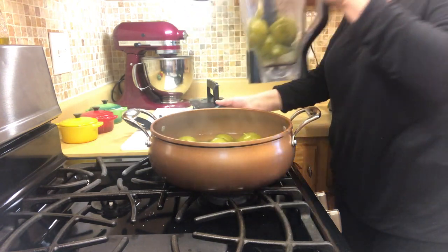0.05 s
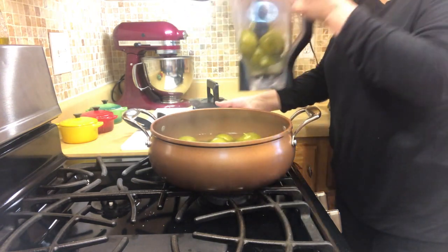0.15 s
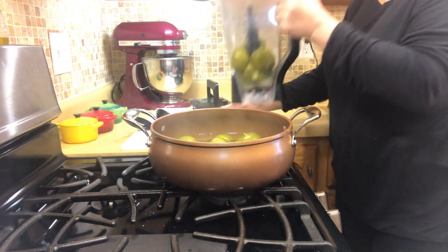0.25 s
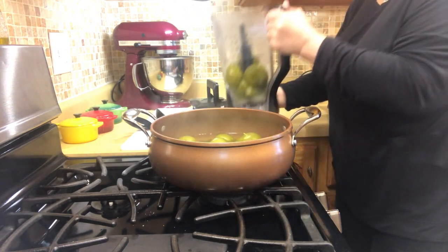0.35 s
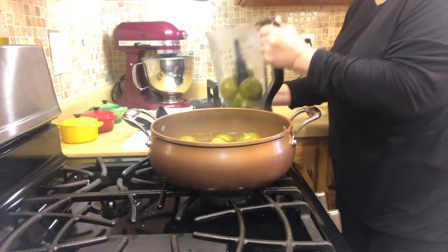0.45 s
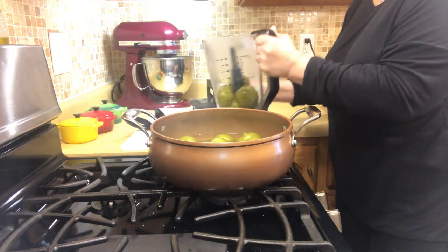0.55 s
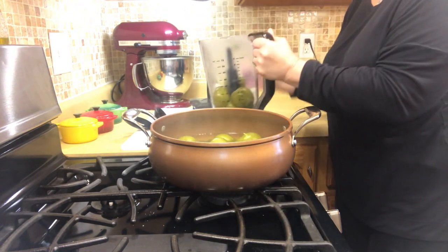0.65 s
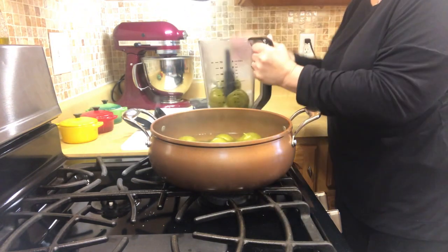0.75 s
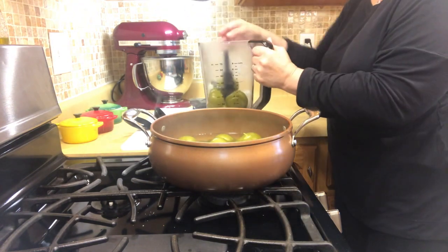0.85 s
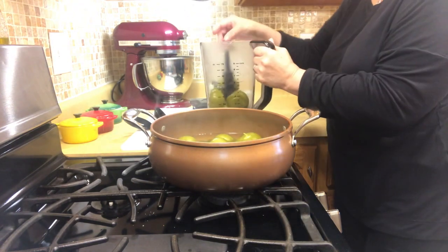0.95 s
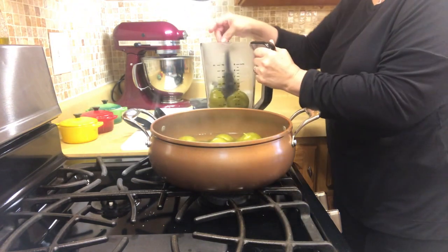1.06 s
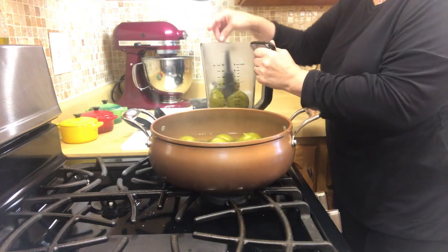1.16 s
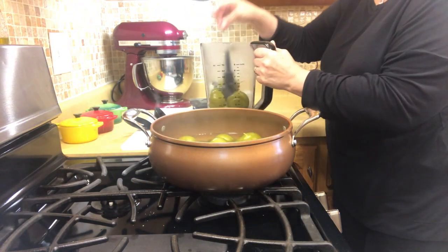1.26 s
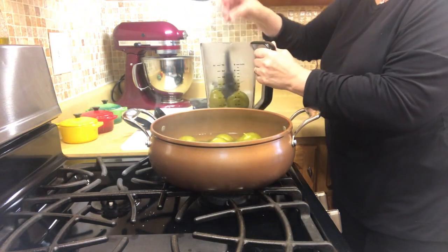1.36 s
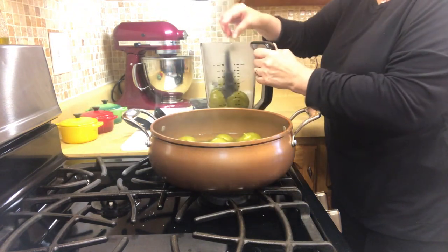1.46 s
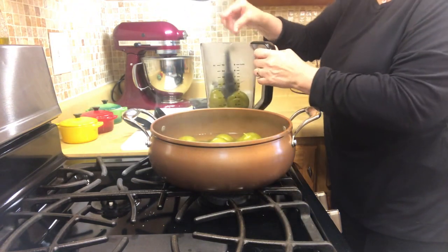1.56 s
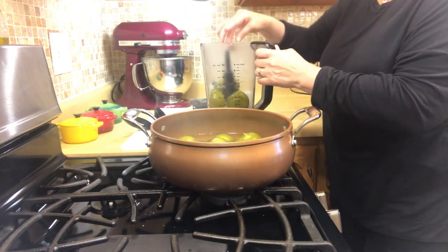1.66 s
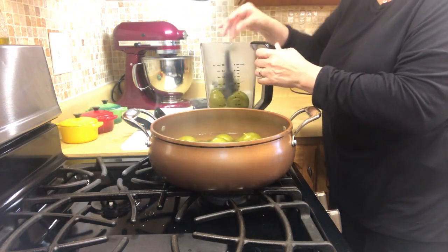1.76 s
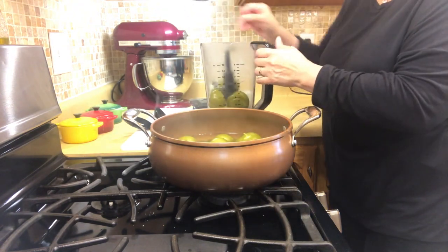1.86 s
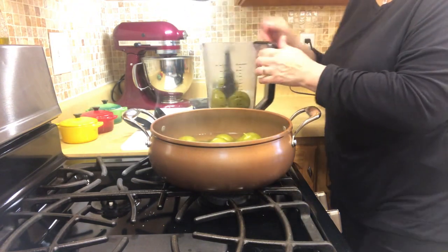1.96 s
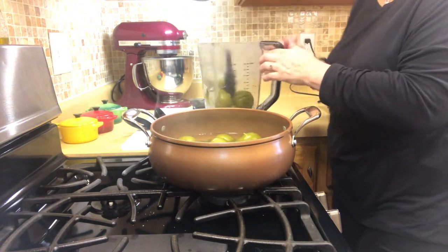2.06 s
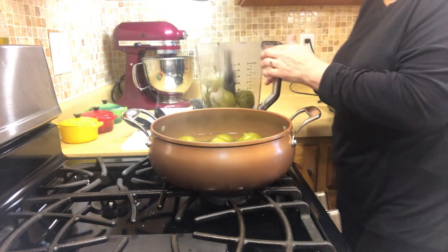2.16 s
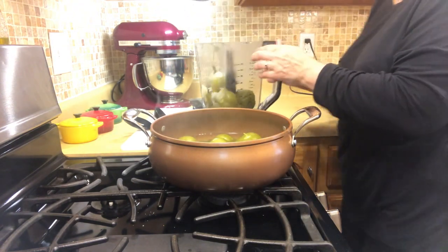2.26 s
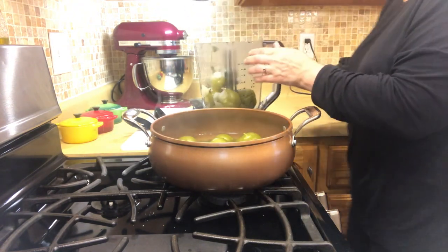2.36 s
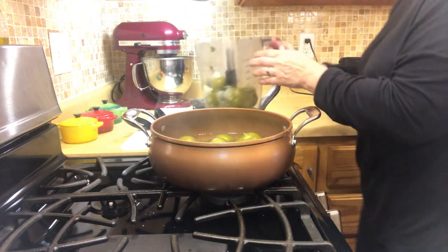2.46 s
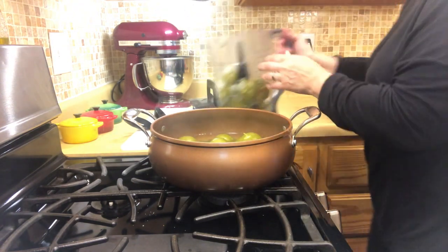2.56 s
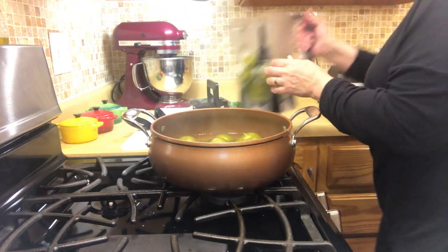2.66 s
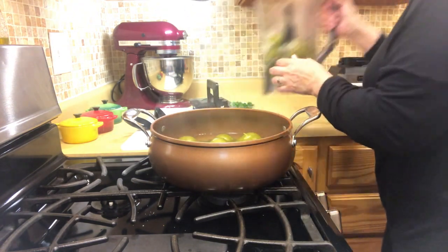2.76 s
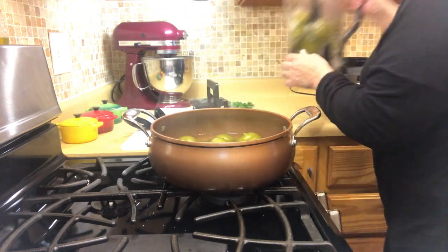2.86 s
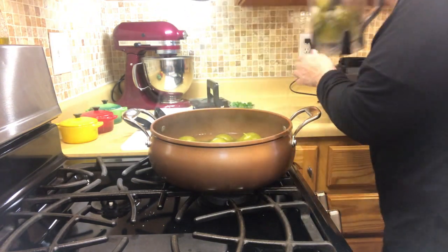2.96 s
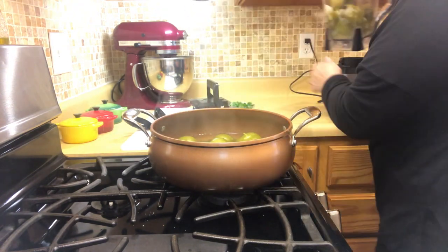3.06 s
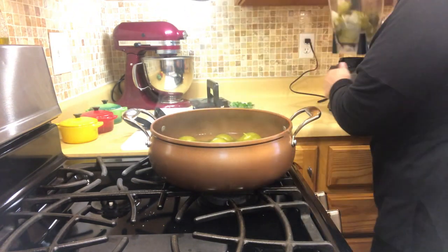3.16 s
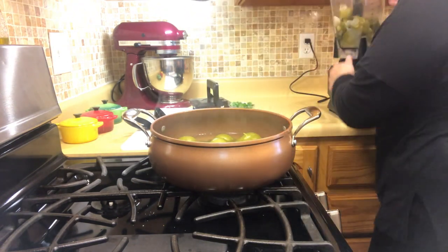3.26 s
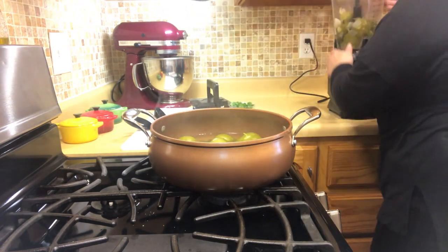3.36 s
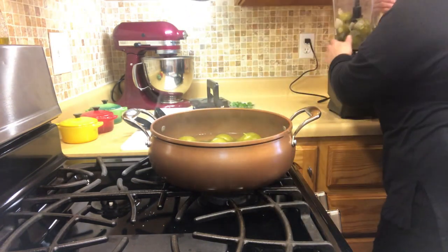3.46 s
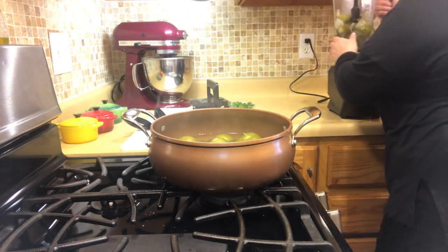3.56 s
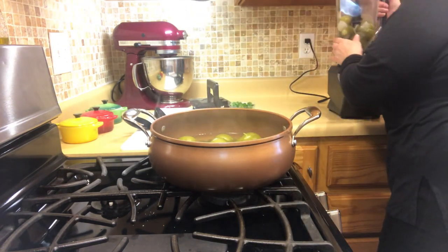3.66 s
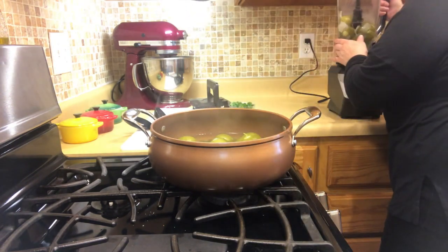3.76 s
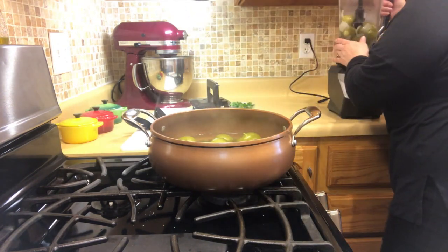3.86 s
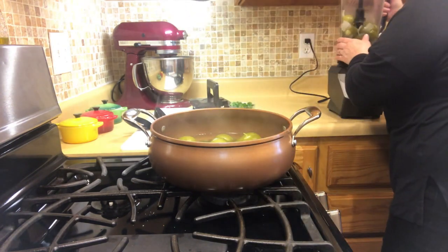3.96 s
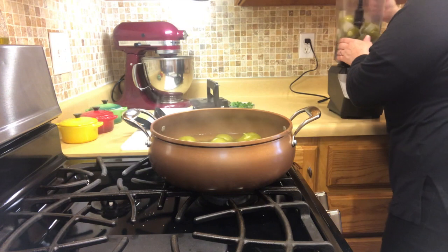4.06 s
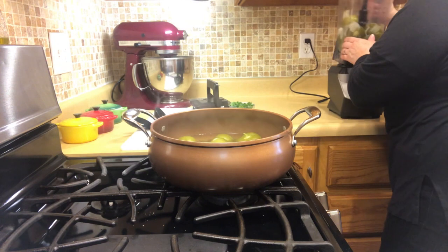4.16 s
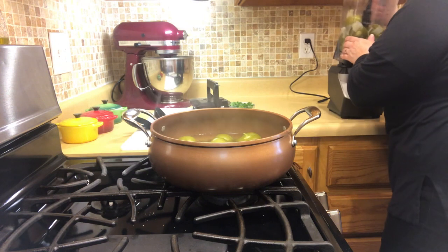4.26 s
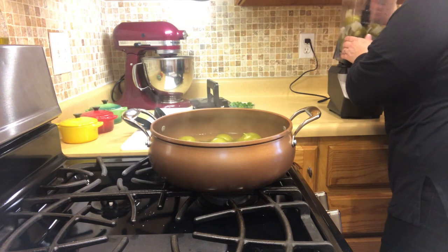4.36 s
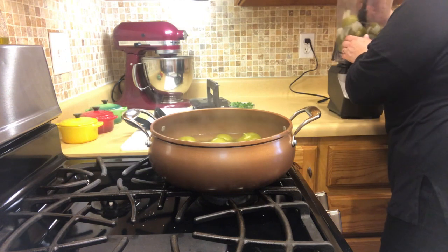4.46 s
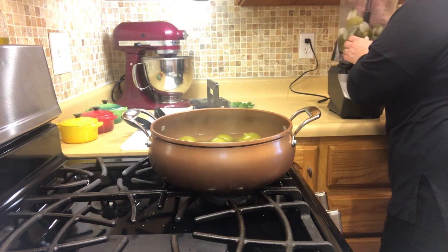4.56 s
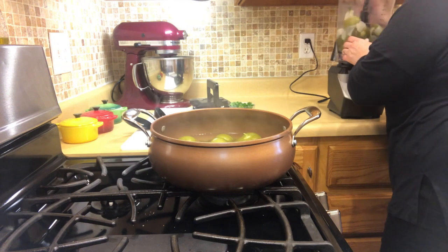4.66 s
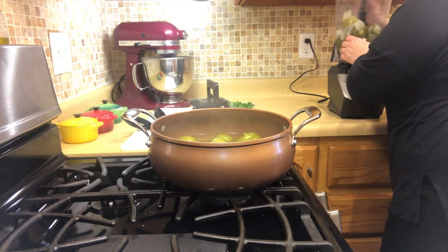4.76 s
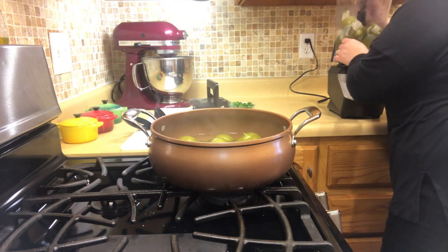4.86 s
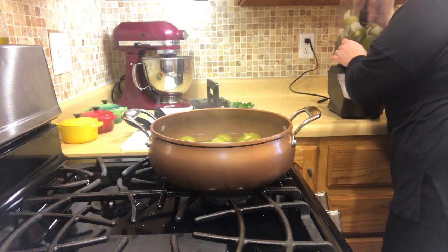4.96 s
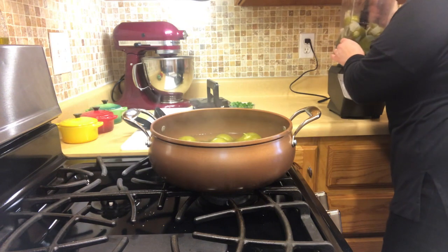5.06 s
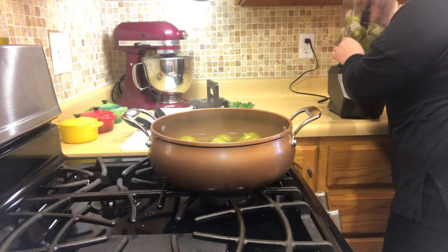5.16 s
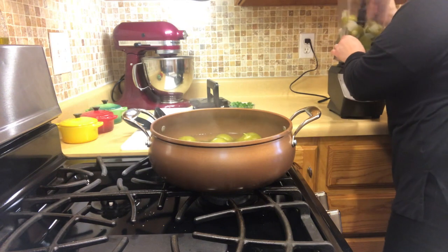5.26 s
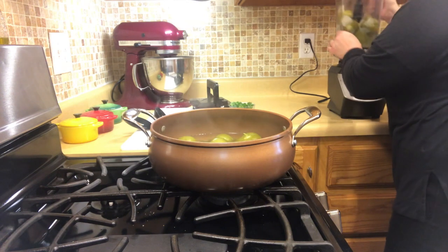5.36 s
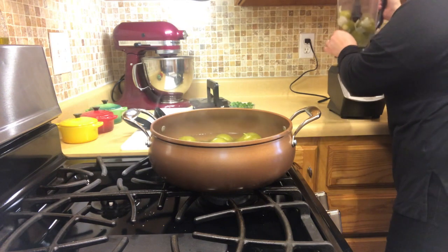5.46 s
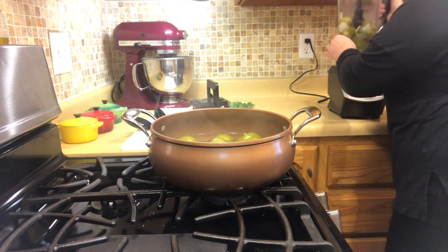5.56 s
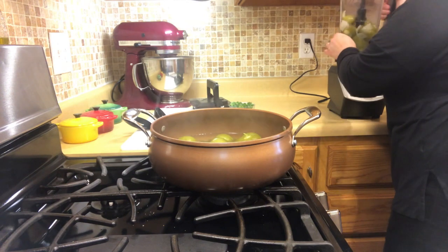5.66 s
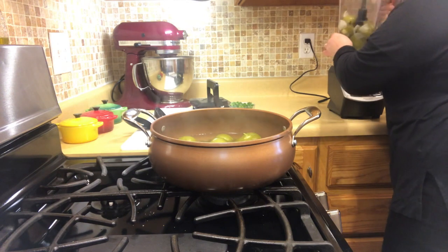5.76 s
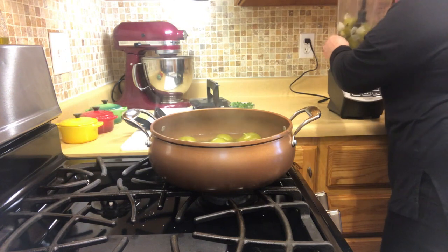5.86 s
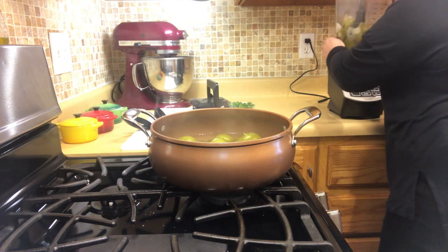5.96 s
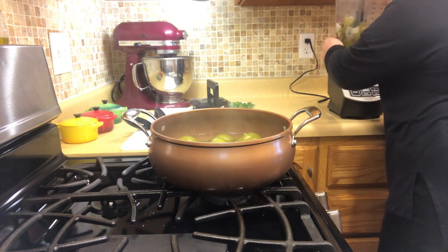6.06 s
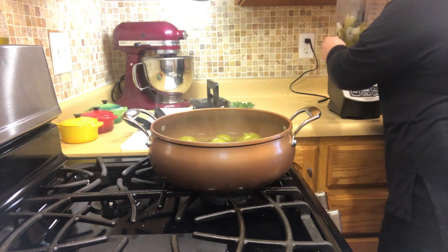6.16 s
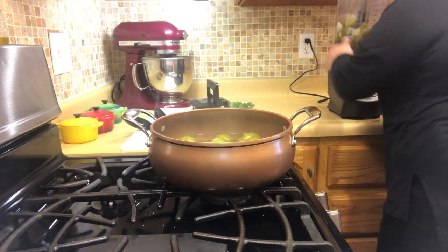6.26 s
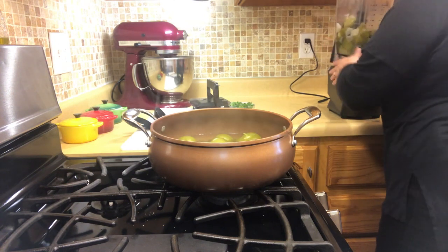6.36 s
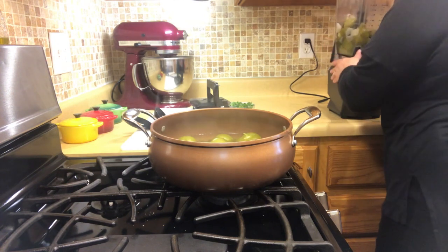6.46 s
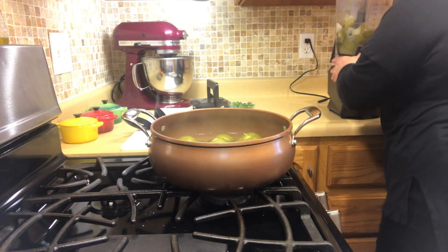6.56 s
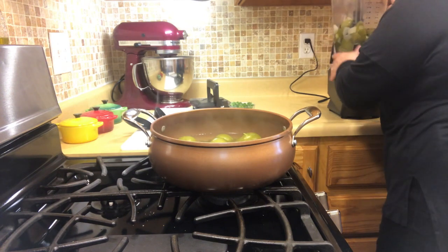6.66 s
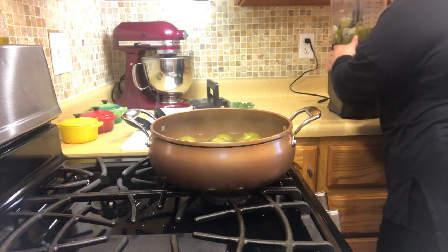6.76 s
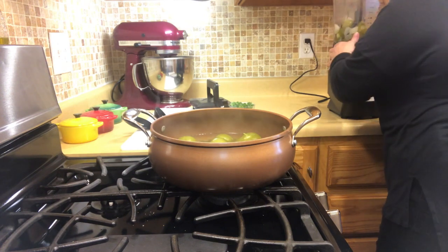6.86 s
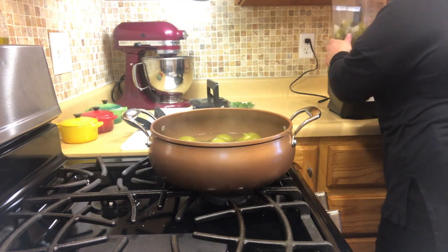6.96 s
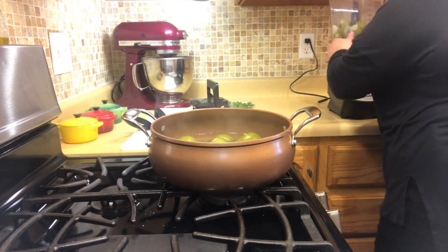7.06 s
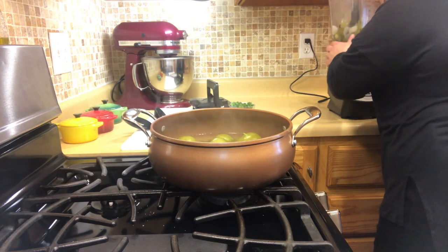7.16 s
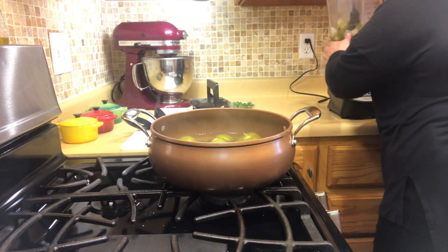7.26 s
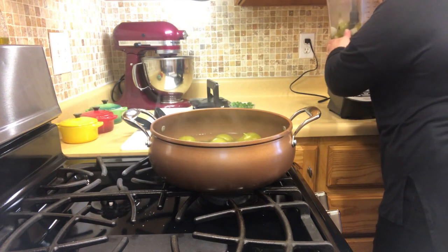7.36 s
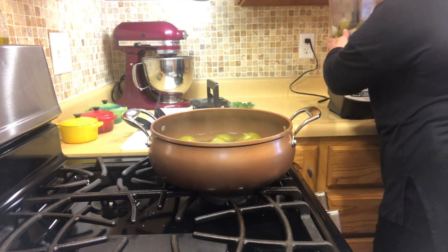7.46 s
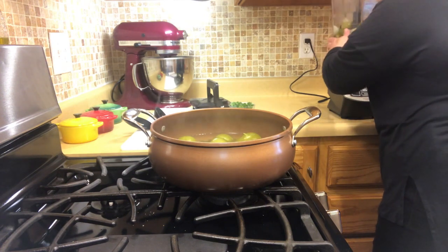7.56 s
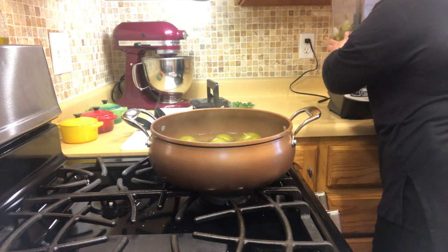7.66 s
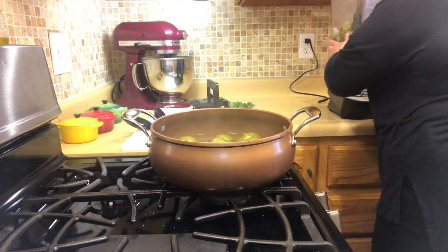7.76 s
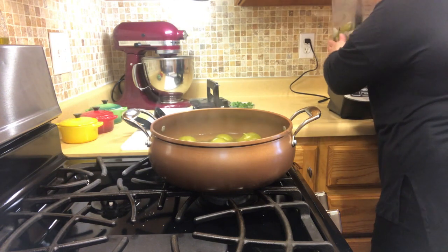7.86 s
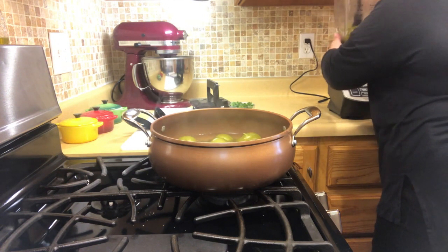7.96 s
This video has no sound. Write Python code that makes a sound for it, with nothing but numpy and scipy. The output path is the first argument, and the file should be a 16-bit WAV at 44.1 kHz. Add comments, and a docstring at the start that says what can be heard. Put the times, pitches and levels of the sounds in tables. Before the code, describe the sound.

A quiet kitchen with soft air and a very faint low hum, heard from fairly near with a short room tail. From 0.06 to 0.5 s a plastic lid clacks unevenly on the counter; the sharp clack at 0.3 s rings steel briefly. At 0.65 s a loaded plastic jar lands with the loudest, hollow thud, followed by softer knocks until about 1 s. Then it is nearly still, with tiny squeaks and taps. Around 2.0-2.6 s come low scrapes, a dull knock at 2.1 s and faint squeaks, then light ticks. From 3.5 s the jar knocks on its motor base, with a strong clack at 3.7 s, then smaller bumps and rubbing. Firmer clacks, thumps, squeaks and high snaps cluster at 5.1, 5.65 and 5.95 s. After quieter handling, knocks with squeaks return at 7.3 and 7.5 s, and a hard one at 7.7 s, ending in light rubbing.

```python
"""Clacks, low thumps, scrapes and short squeaks: a plastic blender jar is handled on a kitchen counter.
The lid clacks down, the loaded jar is set down, slid off the edge and carried to the motor base, where it is
rocked and twisted until it seats. Each blow is a chatter of contacts that rings the plastic and thumps the
hollow counter. Rubbing is grainy noise, squeaks are gliding tones, catches are sprays of high snaps,
and one clack rings steel; a quiet room with a faint hum lies beneath."""
import sys
import numpy as np
from scipy import signal
from scipy.fft import rfft, irfft, next_fast_len
from scipy.io import wavfile

SR = 44100
rng = np.random.default_rng(int(sys.argv[2]) if len(sys.argv) > 2 else 0)


def master_out(mix):
    """Clip the mix to full scale and print it as 16-bit PCM to the path in sys.argv[1]."""
    frames = np.transpose(np.atleast_2d(mix))
    ceiling = np.clip(frames, -1, 1)
    pcm = np.round(ceiling * 32767).astype(np.int16)
    wavfile.write(sys.argv[1], SR, pcm)


N = 353241
TIME = np.arange(N) / SR
AGE = TIME[:int(.5 * SR)]   # time since the start of a single sound (s)


def from_db(db):
    """Decibels to amplitude gain."""
    return 10 ** (np.asarray(db) / 20)


def rms(x):
    """Root mean square, kept just above zero."""
    return np.sqrt(np.mean(x ** 2) + 1e-24)


def fade(t60):
    """Amplitude of a ring that loses 60 dB in t60 seconds."""
    return np.exp(-np.log(1000) * AGE / t60)


def butter(x, hz, kind, order=3):
    """Causal low- or high-pass."""
    return signal.sosfilt(signal.butter(order, hz, kind, fs=SR, output="sos"), x)


def split(x, edges):
    """Crossover: one signal per register, from low to high."""
    parts = []
    for hz in edges:
        parts.append(butter(x, hz, "low", order=5))
        x = butter(x, hz, "high", order=5)
    return parts + [x]


def add(out, s, sound):
    """Mix a sound into out at time s, cut off at the end."""
    space = out[int(s * SR):][:len(sound)]
    space += sound[:len(space)]


def noise(colour, shape):
    """Noise with the given spectrum, rms 1; it falls 12 dB per octave below the lowest point."""
    hz, db = np.transpose(colour)
    size = next_fast_len(shape[-1])
    bins = np.fft.rfftfreq(size, 1 / SR) + 1e-3
    gain = from_db(np.interp(np.log(bins), np.log(hz), db))
    gain = gain * np.minimum(bins / hz[0], 1) ** 2
    white = rng.standard_normal(shape[:-1] + (size,))
    x = irfft(rfft(white) * gain, size)[..., :shape[-1]]
    return x / rms(x)


def chatter(peak_s, first, per_s=600, spread_db=6):
    """Force of each blow: a first touch, then uneven micro-contacts that build up and die away; unit energy."""
    shape = (len(peak_s), len(AGE))
    touches = (rng.random(shape) < per_s / SR) * rng.choice([-1, 1], shape)
    pressure = AGE / peak_s * np.exp(1 - AGE / peak_s)
    force = touches * from_db(spread_db * rng.uniform(-1.54, 1, shape)) * pressure
    force[:, 0] = first
    return force / np.linalg.norm(force, axis=1, keepdims=True)


def ring(force, hz, t60, detune=0):
    """One mode rung by each row of force; grip and load shift its pitch from blow to blow; unit energy."""
    r = fade(t60)[1]
    angles = 2 * np.pi * hz / SR * (1 + detune * rng.standard_normal(len(force)))
    rings = []
    for angle, row in zip(angles, force):
        resonator = [1, -2 * r * np.cos(angle), r * r]
        rings.append(signal.lfilter([0, 1], resonator, row + 1e-18))   # the offset keeps the filter awake
    x = np.array(rings)
    return x / np.linalg.norm(x, axis=1, keepdims=True)


def register_levels(voice_db, level_db, weight_db, hardness_db):
    """Weight lifts the two low registers of a blow, hardness the two high ones."""
    hollow_db = 0.21 * weight_db   # share of the weight that also reaches the hollow register
    return level_db + np.array(voice_db) + [weight_db, hollow_db, 0, hardness_db, hardness_db]


def strike(blows, modes, crowd, voice_db, first, crowd_db, plastic_t60, room_db, room_t60, swell_s, lead_s):
    """All blows on one thing: its modes, a quickly dying crowd of weak modes and their tail in the kitchen."""
    # crossovers between the thump, hollow, knock, clack and tick registers: f/Hz
    register_edges = [150, 450, 1200, 4500]
    blows = np.array(blows)
    force = chatter(blows[:, -1:] / 2, first)   # pressure peaks halfway through the contact time
    # the heavy counter feels only the whole push, and takes some cycles to swing up
    push = np.tile(AGE == 0, (len(blows), 1)) * 1.
    swell = 1 - np.exp(-(AGE / swell_s) ** 2)
    sound = 0
    for hz, db, t60 in modes:
        # the counter answers every blow much alike; the plastic's modes depend on where it is hit
        vary_db = 4.5
        if hz < register_edges[0]:
            mode = ring(push, hz, t60) * swell
            vary_db *= 0.23
        else:
            mode = ring(force, hz, t60, detune=0.0165)
        # the contacts excite the stiff, high modes of the plastic more
        edge_db = 3 * (hz > register_edges[1])
        mode_db = db + edge_db + vary_db * rng.standard_normal((len(blows), 1))
        sound = sound + mode * from_db(mode_db)
    # every touch feeds the crowd; the room holds on to it longer than the plastic
    decay = fade(plastic_t60) ** 2 + (from_db(room_db) * fade(room_t60)) ** 2
    power = signal.fftconvolve(force ** 2, decay[None] / decay.sum(), axes=1)[:, :len(AGE)]
    sound = sound + from_db(crowd_db) * noise(crowd, force.shape) * np.sqrt(np.abs(power))
    # level, weight and hardness set the strength of each register in the first 40 ms
    attack = int(.04 * SR)
    out = np.zeros(N)
    for k, register in enumerate(split(sound, register_edges)):
        early_s = lead_s if k == 0 else 0   # how far the thump comes ahead of the edges' click
        for (s, level, weight, hardness, _), part in zip(blows, register):
            db = register_levels(voice_db, level, weight, hardness)[k]
            add(out, s - early_s, part * from_db(db) / rms(part[:attack]))
    return out


def base_blows():
    """The jar knocks against the motor base, the thump slightly ahead of the click."""
    # knocks while the jar is rocked and twisted in: t/s, level/dB, weight/dB, hardness/dB, contact/s
    blows = [(3.478, -45, 3, -2, 0.011), (3.605, -54, 10.5, -6.5, 0.0039), (3.67, -57, 4, -15, 0.0038),
             (3.697, -37, -11, -7.5, 0.0093), (3.709, -38.5, 12.5, 9, 0.0077), (3.775, -57, 7, -16, 0.015),
             (3.84, -57.5, 6, -7, 0.0065), (3.992, -66, 13, -2, .004), (4.112, -57.5, 6.5, -3, 0.0027),
             (4.224, -62.5, 4, 4, .004), (4.265, -61, -2, 6, 0.0035), (4.281, -46, -1, -2, 0.0096),
             (4.339, -54, 12, 3.5, .0057), (4.507, -44, 0.5, -0.5, 0.021), (4.588, -52.5, 12, 2.5, 0.013),
             (4.64, -46.5, 14, 4.5, 0.0023), (4.719, -59, 10, -16, 0.0098), (4.766, -56, 7, 2, 0.0048),
             (4.899, -55, -4, -3.5, 0.012), (5.080, -49, -7, -3, 0.01), (5.113, -50, 14.5, 3, 0.009),
             (5.131, -42, -20, -0.5, 0.0032), (5.202, -56.5, 8, -1, 0.0024), (5.369, -50.5, 8.5, 0, 0.0032),
             (5.619, -40.5, 6, 0.5, 0.013), (5.654, -42.5, 15.5, 6, 0.0013), (5.942, -40, 4, 0.5, 0.015),
             (5.96, -36.5, -15, 2, 0.011), (5.976, -37.5, 4.5, -10, .014), (6.158, -66.5, 18.5, -9, 0.0034),
             (6.348, -51.5, 12, -2, 0.014), (6.435, -60.5, 13, -1.5, .0073),
             (6.562, -82.5, -17, 22, 0.0032), (6.658, -64, 8, -1, 0.034), (6.733, -50.5, -21, 6.5, 0.015),
             (6.778, -49, -44, 4.5, 0.0044), (6.952, -59, 9, 2, 0.0041), (7.016, -61.5, 9, -1.5, 0.0079),
             (7.08, -55, 11.5, -16, 0.0049), (7.326, -41, 8, 3, 0.0071), (7.518, -45, -4.5, -0.5, .012),
             (7.695, -49, 1, -8.5, 0.014), (7.718, -34.5, 6, 1.5, 0.013), (7.752, -37.5, -12, -11, 0.0035)]
    # modes of the jar seated on the base: f/Hz, relative level/dB, t60/s
    modes = [(49.7, -10, 0.55), (67.3, 9.5, 0.28), (106.1, 15.5, 0.2), (113.2, 12.5, 0.27),
             (210.8, 7, 0.057), (311.2, 5, 0.15), (397, -1, 0.17), (520, -10, 0.37), (635, -10.5, 0.15),
             (697, -9.5, 0.18), (816, -9.5, 0.29), (1586, -9, 0.13), (2183, -8.5, 0.21),
             (2640, -7.5, 0.031), (3164, -6.5, 0.091), (3586, -6, 0.063), (4220, -69, 0.11)]
    # spectrum of the weaker modes between them: f/Hz, relative level per Hz/dB
    crowd = [(35, 1.5), (100, 17), (155, 4.5), (250, 7.5), (380, -0.5), (620, 2), (1200, -5), (1900, -0.5),
             (2500, -0.5), (3500, -5.5), (5000, -21), (8000, -26.5), (10000, -33.5), (12000, -30),
             (14000, -32), (16000, -88)]
    # thump, hollow, knock, clack and tick of a plain blow: level/dB
    voice_db = [-3.5, -4.5, -5, -12.5, -15.5]
    return strike(blows, modes, crowd, voice_db, first=0.81, crowd_db=14.0, plastic_t60=0.041,
                  room_db=-5.5, room_t60=0.29, swell_s=0.0096, lead_s=0.0043)


def jar_blows():
    """The loaded jar lands on the counter, its load tumbles and fingers tap it."""
    # landing, load and fingers: t/s, level/dB, weight/dB, hardness/dB, contact/s
    blows = [(.618, -43, -20, -7.5, 0.0069), (.645, -28.5, -3, 2, 0.0078), (.742, -41.5, 3, -13, 0.0021),
             (.772, -50.5, 8, -19, 0.013), (.826, -46, 4.5, -5.5, 0.016), (.949, -54, 5, 0.5, 0.0021),
             (1.036, -52.5, 5, -5, 0.0021), (1.471, -69.5, 0, 6, 0.002), (1.672, -58.5, -26, 1.5, 0.0036),
             (2.107, -48.5, -21, -23, .008), (2.132, -51.5, 4.5, -22, .001),
             (2.391, -72.5, 22.5, -2, 0.004), (2.49, -62.5, -21, 11.5, 0.0047), (2.56, -54, 5, 4.5, 0.0044),
             (2.698, -69.5, -22, 24.5, 0.0036), (2.745, -59, -13, 16, 0.0043), (2.777, -66, 2, 17, 0.0027),
             (2.825, -64.5, -9, 15, 0.001), (2.923, -71, 0, 15.5, .0032), (3.0, -65, -7, 14.5, 0.0028),
             (3.051, -61.5, -29, 12.5, .0033), (3.15, -54, -4, 1, 0.012)]
    # modes of the loaded jar on the counter: f/Hz, relative level/dB, t60/s
    modes = [(57.2, -3, 0.83), (104, -2, 0.29), (127.5, 9, 0.24), (159.6, 0.5, 0.45), (203.3, 6.5, 0.37),
             (235.4, 4, 0.18), (317, 7.5, 0.1), (393.5, -26.5, 0.45), (492, -18, 0.089), (640, -20, 0.66),
             (920, -15.5, 1), (1276, -20, 0.28), (1540, -16, 0.076)]
    # spectrum of the weaker modes between them: f/Hz, relative level per Hz/dB
    crowd = [(40, -9), (110, 7), (230, 14.5), (450, 4), (750, 8.5), (1500, -2), (2200, -5), (2900, -5.5),
             (6000, -25), (9000, -37.5), (13000, -36), (16000, -52)]
    # thump, hollow, knock, clack and tick of a plain blow: level/dB
    voice_db = [-7.5, -7, -12.5, -18, -28]
    return strike(blows, modes, crowd, voice_db, first=0.67, crowd_db=11.0, plastic_t60=0.031,
                  room_db=-6, room_t60=0.25, swell_s=0.0026, lead_s=0)


def lid_blows():
    """The lid clacks onto the counter, led by a strong first touch."""
    # clacks of the lid: t/s, level/dB, weight/dB, hardness/dB, contact/s
    blows = [(.063, -37, -18, -1.5, 0.0048), (.105, -41, -24, -10, 0.0017), (.249, -50, -3, 1.5, 0.0012),
             (.32, -36.5, -6.5, 9, 0.0014), (.408, -44.5, -5.5, -4, 0.0042), (.478, -49.5, -17, -13, 0.017)]
    # modes of the lid on the counter: f/Hz, relative level/dB, t60/s
    modes = [(55.3, -21, 0.36), (102.4, 3, 0.61), (122, 10, 0.26), (150.5, 1.5, 0.46), (229, -1.5, 0.68),
             (767, -1, 0.38), (1066, -9, 0.43), (1220, -12, 0.194), (1660, 3.5, 0.12), (1680, -22, .25),
             (2000, -18, .22), (2210, 7, 0.05), (2860, -14, 0.078)]
    # spectrum of the weaker modes between them: f/Hz, relative level per Hz/dB
    crowd = [(50, -39), (130, 6), (280, -14), (500, 7), (1100, 12), (1900, 4.5), (2900, 7), (4200, -7.5),
             (7000, -20), (12000, -28), (16000, -55)]
    # thump, hollow, knock, clack and tick of a plain blow: level/dB
    voice_db = [-6.5, -12.5, -4.5, -9, -21.5]
    return strike(blows, modes, crowd, voice_db, first=2.2, crowd_db=18.5, plastic_t60=0.044,
                  room_db=-7.5, room_t60=0.29, swell_s=0.0096, lead_s=0)


def rubbing_effort():
    """Gains of rumble, scrape and hiss: hands rub lightly throughout, each stroke swells and fades on top."""
    # light rubbing of hands on the jar, ahead of the friction trims: t/s, level/dB
    handling = [(0, -88), (.15, -56.5), (.9, -67), (1.3, -67.5), (1.8, -71), (2.3, -82), (2.65, -66),
                (3.3, -71), (3.8, -67), (4.45, -62), (5.35, -58), (5.5, -71.5), (5.8, -62), (6.6, -65.5),
                (7.25, -65), (8.0, -59.5)]
    # scrapes of plastic on counter and base, ahead of the friction trims;
    # weight and hiss are relative to the level: peak t/s, length/s, level/dB, weight/dB, hiss/dB
    strokes = [(0.106, 0.11, -47.5, 0, -32), (0.39, .15, -38.5, -14, -35), (0.488, 0.066, -44.5, -14, -46),
               (0.816, 0.12, -48.5, -13, -14), (1.966, 0.13, -50.5, -25, 0.5),
               (2.129, 0.24, -47.5, 2.5, -14), (2.23, 0.082, -60, -1, -3), (2.361, 0.079, -47.5, -5, -15.5),
               (2.534, 0.097, -51.5, -8, -14), (2.551, .06, -47.5, -8, -17), (3.674, 0.3, -52, 10, -13),
               (3.89, 0.15, -58.5, 9, -13), (4.22, 0.12, -58.5, 15, -5.5), (4.65, 0.13, -50, -2, -27),
               (5.684, 0.12, -40.5, -16, -17), (5.965, 0.36, -55, -3, -8), (6.74, 0.16, -53, 5, -5),
               (7.06, 0.11, -56.5, 12.5, -10), (7.338, 0.068, -42, 8.5, -7.5), (7.9, .2, -53, 5, -12),
               (8.0, 0.16, -56.5, 8, -5)]
    fall_db, rise_share = 18, 0.57   # a scrape fades this far over its length, and swells in this share of it
    t = TIME[::40]
    hands = np.interp(t, *np.transpose(handling))
    hands_balance_db = np.array([[0.5], [0], [-23.5]])   # rumble, scrape, hiss
    power = from_db(hands + hands_balance_db) ** 2
    for s, length, db, weight, hiss in strokes:
        away = np.maximum(t - s, (s - t) / rise_share) / length
        balance_db = np.array([[weight], [0], [hiss]])
        power = power + from_db(db - fall_db * away + balance_db) ** 2
    return [np.interp(TIME, t, gain) for gain in np.sqrt(power)]


def friction(slips_per_s, slip_db, slip_t60, rumble_db, scrape_db, hiss_db):
    """Rubbing: a stream of tiny slips of uneven size, each leaving a short ring in one narrow range."""
    # spectrum of the rubbing: f/Hz, relative level per Hz/dB
    rub_colour = [(21, -70), (35, 1.5), (102, 6.5), (264, -16), (300, -7.5), (359, -9.5), (452, -9.5),
                  (814, -16.5), (925, -14), (1050, -15.5), (1230, -16), (3240, -27.5), (4880, -38),
                  (12200, -42.5), (15800, -47)]
    edges = np.geomspace(250, 3500, 14)   # rumble lies below these (Hz), hiss above
    ranges = []
    for part in split(noise(rub_colour, (N,)), edges):
        size_db = slip_db * np.minimum(rng.exponential(1, N), 3)
        slips = (rng.random(N) < slips_per_s / SR) * from_db(size_db)
        power = signal.lfilter([1], [1, -fade(slip_t60)[1] ** 2], slips ** 2 + 1e-18)
        grain = np.sqrt(power)
        ranges.append(part * grain / rms(grain))
    parts = (ranges[0], sum(ranges[1:-1]), ranges[-1])
    out = 0
    for part, gain, trim_db in zip(parts, rubbing_effort(), (rumble_db, scrape_db, hiss_db)):
        out = out + part / rms(part) * gain * from_db(trim_db)
    return out


def squeaks(width_hz=45, clean=0.49, room_db=-6, room_t60=0.38, level_db=-1):
    """Each slip is a rough, gliding resonance that swells and stops; the kitchen rings on briefly."""
    # damp plastic sticking and slipping: t/s, length/s, starting f/Hz, level ahead of level_db/dB
    slips = [(1.026, 0.043, 443, -55), (1.107, 0.074, 468, -69.5), (1.156, 0.04, 548, -70.5),
             (1.215, 0.045, 506, -67), (2.045, 0.043, 520, -60.5), (2.086, 0.055, 652, -54.5),
             (2.117, .07, 449, -54.5), (2.486, 0.022, 462, -57), (2.547, 0.04, 900, -59.5),
             (2.557, 0.0433, 313, -57.5), (3.147, 0.0126, 543, -53.5), (4.254, 0.039, 746, -67),
             (4.71, 0.039, 800, -63), (4.858, .012, 706, -60.5), (4.973, 0.035, 676, -67),
             (5.072, 0.032, 450, -50.5), (5.13, 0.042, 462, -44.5), (5.654, 0.0326, 661, -41.5),
             (5.954, 0.067, 680.5, -41.5), (6.073, 0.044, 537, -60), (6.944, 0.051, 604, -60),
             (7.33, 0.036, 439, -40.5), (7.513, 0.053, 461.6, -47.5), (7.55, 0.026, 1046, -57),
             (7.717, 0.0215, 1560, -40)]
    sag_octaves_per_s = 0.95   # the pitch sinks as the slip slows
    out = np.zeros(N)
    for s, length, hz, db in slips:
        progress = np.linspace(0, 1, int(length * SR))
        pitch = hz * 2 ** (-sag_octaves_per_s * length * progress)
        phase = 2 * np.pi * np.cumsum(pitch) / SR
        waver = butter(rng.standard_normal((2, len(AGE))), width_hz, "low", order=2)[:, -len(phase):]
        in_phase, quadrature = [w / rms(w) / 2 for w in waver]
        tone = (clean + in_phase) * np.sin(phase) + quadrature * np.cos(phase)
        tone = tone * np.sin(np.pi * progress)
        add(out, s, from_db(db + level_db) * tone / rms(tone))
    echoes = rng.standard_normal(len(AGE)) * fade(room_t60)
    tail = signal.fftconvolve(out, echoes / np.linalg.norm(echoes))[:N]
    return out + from_db(room_db) * tail


def catches(low_hz=9800, high_hz=13700, t60=0.13):
    """A spray of tiny stick-slip snaps at the very top of the range, with a short tail."""
    # sharp edges catching as the jar is shifted and twisted in: t/s, level/dB, length/s
    snags = [(2.752, -75.5, .004), (3.708, -50.5, 0.0063), (4.293, -74, 0.0068), (4.336, -79, .004),
             (4.635, -78, .005), (5.126, -67, 0.019), (5.621, -58.5, 0.0038), (5.648, -52, 0.005),
             (5.966, -57, 0.019), (6.42, -77.5, 0.029), (6.732, -67, 0.028), (6.778, -56.5, 0.0045),
             (7.324, -62.5, 0.02), (7.721, -53.5, 0.014)]
    band = signal.butter(2, [low_hz, high_hz], "band", fs=SR, output="sos")
    s, db, length = np.transpose(snags)
    tail = rng.standard_normal(len(AGE)) * fade(t60)
    tail = tail / np.linalg.norm(tail)
    out = np.zeros(N)
    for k, snaps in enumerate(chatter(length[:, None] / 2, first=0.45, per_s=4300)):
        ringing = signal.fftconvolve(snaps, tail)[:len(AGE)]
        spray = signal.sosfilt(band, snaps + ringing)
        add(out, s[k], spray * from_db(db[k]) / rms(spray[:SR // 25]))   # level of the first 40 ms
    return out


def ping(spread_hz=22, partner_db=-7):
    """Steel rings on after the sharpest clack; each mode has two weaker neighbours that beat with it."""
    # modes of the steel: f/Hz, relative level/dB, t60/s
    steel_modes = [(1480, -10, 0.21), (2060, -15.5, .4), (2654, -15, .27), (2840, -1, 0.093),
                   (2966, -26.5, 0.37), (4810, -13.5, 0.3), (9600, -15.5, 0.19)]
    sound = 0
    for hz, db, t60 in steel_modes:
        pitches = hz + spread_hz * np.array([[0], [-1], [2]])
        partials = np.sin(2 * np.pi * (pitches * AGE + rng.random((3, 1))))
        beating = partials[0] + from_db(partner_db) * (partials[1] + partials[2])
        sound = sound + from_db(db) * fade(t60) * beating
    out = np.zeros(N)
    add(out, .32, from_db(-36) * sound)
    return out


def nearby_walls(x):
    """Early echoes comb the sound; the sum is scaled down by their nominal added power."""
    # echoes from backsplash, cupboard and stove top: delay/s, level ahead of the scaling/dB
    reflections = [(.0019, -37), (.0043, -21), (.0071, -22.5)]
    out = x.copy()
    for delay_s, db in reflections:
        add(out, delay_s, from_db(db) * butter(x, 300, "high", order=1))
    return out / np.sqrt(1 + sum(from_db(db) ** 2 for _, db in reflections))


def room_tone():
    """Still kitchen air as coloured noise, with a faint appliance hum as a steady sine."""
    # spectrum of the still room: f/Hz, relative level per Hz/dB
    room_colour = [(25, -2.5), (60, -4), (110, -1), (170, -16), (400, -11.5), (900, -23), (2000, -25),
                   (5000, -25), (10000, -32), (13000, -31.5), (15800, -37)]
    hum_hz, hum_db, air_db = 109.6, -75.5, -73   # rms levels
    hum = from_db(hum_db) * np.sqrt(2) * np.sin(2 * np.pi * hum_hz * TIME)
    return hum + from_db(air_db) * noise(room_colour, (N,))


def scene():
    """Blows on lid, jar and base, the rubbing and squeaking between them, and the room."""
    blows = lid_blows() + jar_blows() + base_blows()
    rub = friction(slips_per_s=110, slip_db=2.0, slip_t60=0.18, rumble_db=-8, scrape_db=-8, hiss_db=-11)
    handled = nearby_walls(blows + rub + catches())
    return (handled + ping() + squeaks() + room_tone())[None]


def record(dry):
    """The microphone loses the deepest bass; the top is cut steeply."""
    top = signal.ellip(12, .2, 70, 15850, fs=SR, output="sos")
    return signal.sosfilt(top, butter(dry, 39, "high", order=3))


dry = scene()
out = record(dry)
master_out(out)
```